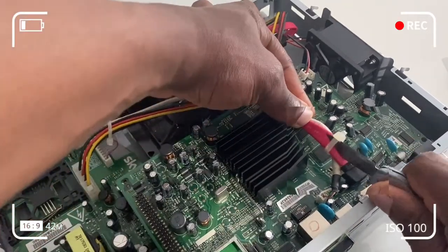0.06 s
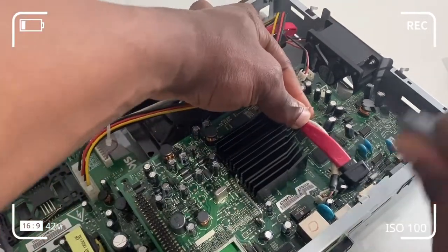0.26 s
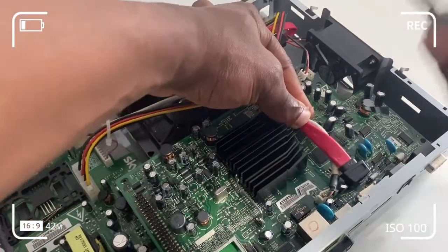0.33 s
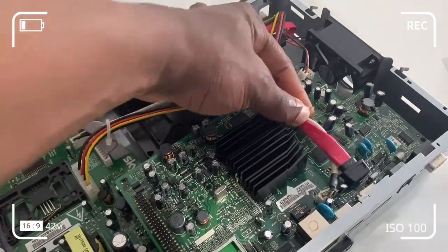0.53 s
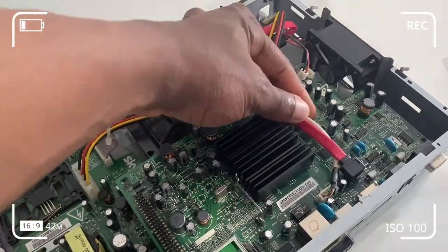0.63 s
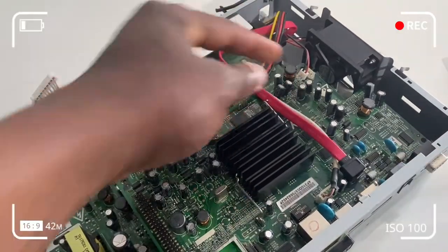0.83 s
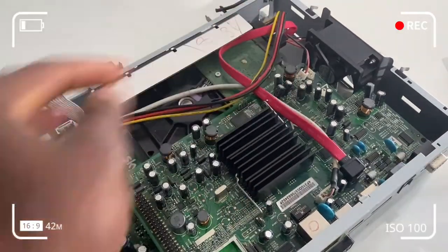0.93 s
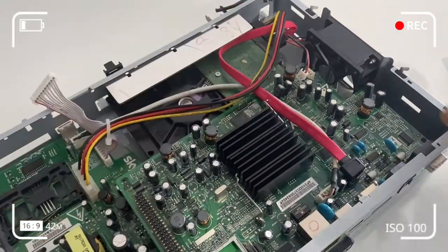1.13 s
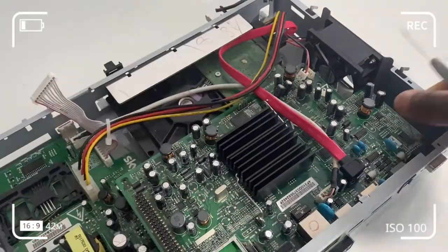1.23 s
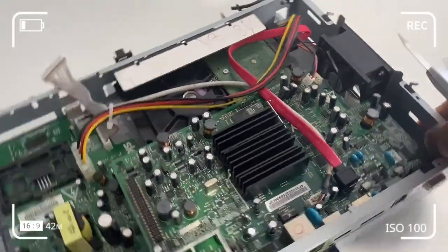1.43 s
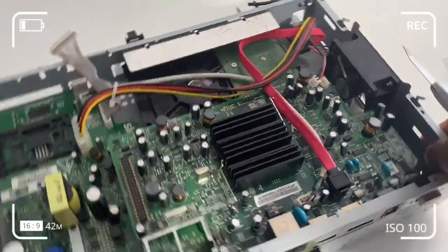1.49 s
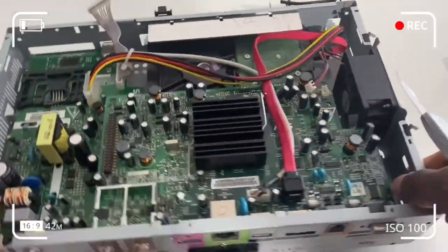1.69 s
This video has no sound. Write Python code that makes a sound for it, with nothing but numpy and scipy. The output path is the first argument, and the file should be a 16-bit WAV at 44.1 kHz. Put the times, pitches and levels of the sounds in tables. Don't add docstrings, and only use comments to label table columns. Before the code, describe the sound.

A blade snaps a plastic cable tie with a loud crack and brief metal rattle; quiet finger taps, tiny ticks, a case scrape and a closing thud follow, close stereo microphone, small room.

```python
import sys
import numpy as np
from scipy import signal
from scipy.fft import rfft, irfft, next_fast_len
from scipy.io import wavfile
from scipy.ndimage import uniform_filter1d, map_coordinates

SR = 44100
rng = np.random.default_rng(int(sys.argv[2]) if len(sys.argv) > 2 else 0)


def boost_factor(decibels):
    exponent = np.asarray(decibels, float) / 20
    return 10 ** exponent


def wav_out(sig):
    wavfile.write(sys.argv[1], SR, np.round(np.clip(np.atleast_2d(sig).T, -1, 1) * 32767).astype(np.int16))


N = 77175
SCENE_S = np.arange(N) / SR
EVENT_S = np.arange(SR // 2) / SR

# start [s], level [dB].
SNAP = [
    (0.2327, -14),
    (.2334, -4.5),
    (.235, -11.5),
    (.2382, -8),
    (.2398, -13),
    (.2416, -14),
]


def unit(x):
    return x / np.sqrt(np.mean(x ** 2) + 1e-20)


def along(points, hz):
    point_hz, value = np.transpose(points)
    return np.interp(np.log(hz + 1), np.log(point_hz + 1), value)


def filtered(x, response):
    size = next_fast_len(x.shape[-1] + 8192)
    spectrum = rfft(x, size) * response(np.fft.rfftfreq(size, 1 / SR))
    return irfft(spectrum, size)[..., :x.shape[-1]]


def noise(spectrum, size):
    return unit(filtered(rng.standard_normal(size), lambda hz: boost_factor(along(spectrum, hz))))


def wobble(rate_hz):
    knots = rng.standard_normal(int(N * rate_hz / SR) + 4)
    return map_coordinates(knots, [np.arange(N) * rate_hz / SR])


def fade(rise_s, t60_s):
    return (1 - np.exp(-EVENT_S / max(rise_s, 1e-4))) * boost_factor(-60 * EVENT_S / t60_s)


def ring(modes, rise_s, scatter_db):
    out = 0
    for hz, db, t60_s in modes:
        level = boost_factor(db + scatter_db * rng.normal())
        out = out + level * fade(rise_s, t60_s) * np.sin(2 * np.pi * hz * EVENT_S)
    return out


def add(out, start_s, x):
    part = out[round(start_s * SR):][:len(x)]
    part += x[:len(part)]


def room(x):
    # frequency [Hz], t60 [s].
    room_t60 = [(100, 0.23), (700, 0.23), (1500, 0.17), (4500, 0.23), (12000, 0.12)]
    hz, t, z = signal.stft(rng.standard_normal((2, SR // 2)), SR, nperseg=256)
    decay = boost_factor(-60 * t / along(room_t60, hz)[:, None])
    tail = signal.istft(z * decay, SR, nperseg=256)[1]
    tail = tail / np.linalg.norm(tail[0])
    delayed = np.pad(x, (200, 0))[None]
    return signal.fftconvolve(delayed, tail, axes=1)[:, :N]


def handling():
    # time [s], fizz level [dB], rumble level [dB].
    levels = [(0, -70, -65), (.07, -75, -67), (.2, -90, -66), (.39, -67, -61), (.45, -73.5, -69),
              (.6, -70, -61.5), (0.748, -70.5, -63), (.86, -80.5, -65.5), (0.899, -83.5, -71),
              (1.219, -87, -78), (1.26, -81, -57), (1.363, -57, -55.5), (1.47, -74, -57.5),
              (1.559, -72.5, -66.5), (1.7, -67, -66), (1.75, -55, -74)]
    # frequency [Hz], level [dB].
    fizz_spectrum = [(150, -28.5), (300, -7), (800, -2), (2200, -6.5), (6000, -13.5), (10000, -18.5),
                     (13000, -24.5), (16000, -41)]
    # frequency [Hz], level [dB].
    rumble_spectrum = [(20, -15.5), (45, -2), (80, -0.5), (160, -7), (330, -14), (480, -24), (750, -23.5),
                       (1100, -49)]
    s, fizz_db, rumble_db = np.transpose(levels)
    fizz_db = np.interp(SCENE_S, s, fizz_db) + 1.4 * wobble(27) + 0.58 * wobble(430) + 0.5
    rumble_db = np.interp(SCENE_S, s, rumble_db) + 2.5 * wobble(19)
    return boost_factor(fizz_db) * noise(fizz_spectrum, N) + boost_factor(rumble_db) * noise(rumble_spectrum, N)


def brush(rows, spectrum):
    # frequency [Hz], level [dB], t60 [s].
    panel = [(705, -1, 0.087), (880, 0.5, 0.0653), (1293, -2.5, 0.013), (1940, -9, 0.068)]
    grain_db = 19
    out = np.zeros(N)
    for s, db, rise_s, t60_s, ring_db in rows:
        grain = boost_factor(grain_db * uniform_filter1d(rng.standard_normal(len(EVENT_S)), size=40))
        rub = fade(rise_s, t60_s) * unit(grain * noise(spectrum, len(EVENT_S)))
        add(out, s, boost_factor(db) * (rub + boost_factor(ring_db) * ring(panel, rise_s, 1.2)))
    return out


def finger_taps():
    # start [s], level [dB], rise [s], t60 [s], panel ring [dB].
    touches = [(.175, -66.5, 0.0047, 0.11, -7), (.212, -52.5, 0.021, 0.63, -29),
               (.451, -58.5, 0.0018, .04, -14), (.476, -54.5, 0.0022, 0.036, -17),
               (.591, -66.5, 0.0013, 0.028, 9.5), (.596, -52, 0.0026, 0.15, -8),
               (.63, -54.5, .002, 0.069, -22.5), (.6775, -52, 0.0011, 0.041, -12),
               (.69, -48.5, 0.0016, 0.029, -4), (.759, -48, 0.0023, 0.028, -34),
               (.765, -43, 0.006, 0.073, -4), (.819, -57, 0.0019, 0.044, -1),
               (1.358, -48, 0.00066, 0.11, -7), (1.608, -58.5, 0.0015, 0.062, -6.5),
               (1.64, -62, 0.0018, 0.052, -11), (1.722, -54, 0.002, 0.096, 6),
               (1.725, -43, 0.003, 0.29, -14), (1.742, -47, 0.0023, 0.13, 2)]
    # frequency [Hz], level [dB].
    touch_spectrum = [(150, -35), (300, -7.5), (600, -4), (2200, -4.5), (5000, -12), (9000, -20.5),
                      (16000, -28.5)]
    return brush(touches, touch_spectrum)


def case_scrapes():
    # start [s], level [dB], rise [s], t60 [s], panel ring [dB].
    slides = [
        (.513, -45, 0.0061, 0.045, -10),
        (.764, -42.5, 0.00077, 0.023, -23),
        (1.229, -51.5, 0.0076, 0.19, -5),
        (1.249, -38.5, 0.0031, 0.2, -14.5),
        (1.275, -54, 0.0022, 0.044, -15),
        (1.305, -55, 0.0051, 0.25, 6),
        (1.374, -48.5, 0.002, 0.27, 1),
        (1.3955, -34, 0.00079, 0.05, -10.5),
        (1.432, -53, 0.0043, 0.14, -26.5),
    ]
    # frequency [Hz], level [dB].
    scrape_spectrum = [(150, -45.5), (300, -5), (600, -4), (2200, -7), (5500, -6), (9000, -10),
                       (16000, -13)]
    return brush(slides, scrape_spectrum)


def panel_buzz():
    start_s, rise_s, end_s, fall_s, level_db = 1.378, 0.014, 1.427, 0.0054, -41.5
    rise = np.clip((SCENE_S - start_s) / rise_s, 0, 1) ** 2
    fall = np.clip((end_s - SCENE_S) / fall_s, 0, 1)
    modes = 0
    for hz, db in [(680, -0.5), (855, -10)]:
        phase = 2 * np.pi * hz * SCENE_S + 1.06 * wobble(110)
        modes = modes + boost_factor(db + 2.8 * wobble(90)) * np.sin(phase)
    return boost_factor(level_db) * rise * fall * modes


def wire_squeak():
    start_s, length_s, centre_hz, width_hz, level_db = 0.7, 0.062, 10220, 150, -76
    white = rng.standard_normal(len(EVENT_S))
    thin = unit(filtered(white, lambda hz: np.exp(-((hz - centre_hz) / width_hz) ** 2)))
    swell = np.sin(np.pi * np.clip(EVENT_S / length_s, 0, 1))
    out = np.zeros(N)
    add(out, start_s, boost_factor(level_db) * thin * swell)
    return out


def thuds():
    # start [s], level [dB], frequency [Hz], t60 [s].
    blows = [(0.2405, -13, 149.9, 0.045), (.236, -28.5, 213.3, 0.2), (0.2337, -18.5, 322.4, 0.052),
             (0.2691, -17.5, 106.5, 0.065), (.279, -31.5, 194, 0.11), (0.32, -40.5, 93.4, 0.09),
             (.352, -43, 69.4, 0.11), (0.702, -40, 177, 0.052), (0.849, -57.5, 333.7, 0.14),
             (1.253, -38, 480, 0.045), (0.689, -44, 488, 0.052), (1.2913, -30.5, 93, 0.049),
             (1.413, -49, 113.3, 0.2), (1.451, -55.5, 64.7, 0.57), (1.726, -16.5, 203, 0.025),
             (1.727, -29, 70.1, 0.09), (1.7308, -12, 121.1, 0.045)]
    out = np.zeros(N)
    for s, db, hz, t60_s in blows:
        add(out, s, boost_factor(db) * ring([(hz, 0, t60_s)], 0.006, 0))
    return out


def ticks():
    # start [s], level [dB], index of part.
    drops = [
        (1.032, -48.5, 0),
        (1.047, -52.5, 1),
        (1.115, -43, 2),
        (1.1273, -59, 2),
    ]
    # frequency [Hz], level [dB], t60 [s].
    parts = [
        [(2050, 4, .011), (2310, -12, .06), (2200, -17, .05), (5300, -8, .012), (9000, -12, .012),
         (11500, -9, .012)],
        [(2300, -9, .02), (3800, -3, .015)],
        [(2300, -17, .02), (3710, -12, .015), (5440, -2, .02), (5900, -2, .014), (9300, 0, .008),
         (14400, -17, .09)],
    ]
    crack_spectrum = [(1200, -42.5), (2000, -5.5), (6000, 7.0), (16000, -10)]  # Hz, dB
    crack_db, crack_t60_s, tail_db, tail_t60_s = -10, 0.0095, -22, 0.14
    out = np.zeros(N)
    for s, db, part in drops:
        shape = boost_factor(crack_db) * fade(0.00022, crack_t60_s) + boost_factor(tail_db) * fade(0.0034, tail_t60_s)
        crack = shape * noise(crack_spectrum, len(EVENT_S))
        add(out, s, boost_factor(db) * (ring(parts[part], 0.00092, 1.8) + crack))
    return out


def knocks():
    # start [s], level [dB], frequency [Hz], t60 [s].
    contacts = [(0.237, -15, 5780, 0.017), (.2475, -24, 5200, 0.016), (0.238, -12, 2270, 0.01),
                (0.24, -16, 3230, 0.016), (.577, -56.5, 2216, 0.024), (.591, -52, 846, 0.034),
                (.5965, -58, 3555, .012), (.604, -51, 2540, 0.041), (0.616, -51, 2500, 0.037),
                (.6315, -55, 2100, 0.033), (.648, -59.5, 2000, 0.027), (.679, -51.5, 1400, 0.024),
                (.691, -59, 4350, 0.018), (.692, -54, 1840, 0.017), (0.7584, -54, 5000, .008),
                (0.7661, -43.5, 2645, 0.016), (0.771, -49, 1120, 0.012), (.776, -46, 847, 0.044),
                (0.819, -60, 2418, 0.022), (1.2557, -50, 3680, .02), (1.2732, -48, 3180, .02),
                (1.279, -44.5, 2170, 0.028), (1.284, -48, 1690, 0.023), (1.359, -42, 4750, 0.012),
                (1.3607, -39, 2000, 0.024), (1.3747, -46.5, 1860, 0.036), (1.383, -43, 2214, 0.058),
                (1.391, -40, 1544, 0.053), (1.4, -45.5, 1517, 0.056), (1.396, -29, 5410, 0.02),
                (1.401, -37, 4470, 0.027), (1.53, -59, 4020, .03), (1.609, -60.5, 897, 0.035),
                (1.612, -57, 1304, 0.046), (1.643, -58, 1252, 0.044), (1.668, -58.5, 880, 0.036),
                (1.69, -67, 1248, 0.033), (1.7218, -49.5, 2143, .008), (1.7241, -42, 547.5, 0.063),
                (1.7263, -42.5, 1700, .03), (1.73, -56, 2390, 0.018), (1.7452, -31, 925, 0.037),
                (1.7475, -36, 744, .03)]
    waver_rad, rise_s = 1.3, 0.0003
    out = np.zeros(N)
    for s, db, hz, t60_s in contacts:
        waver = waver_rad * unit(uniform_filter1d(rng.standard_normal(len(EVENT_S)), size=60))
        note = np.sin(2 * np.pi * hz * EVENT_S + waver - waver[0])
        add(out, s, boost_factor(db) * fade(rise_s, t60_s) * note)
    return out


def floor_boom():
    # frequency [Hz], level [dB].
    boom_spectrum = [(30, -29.5), (60, -6), (120, -0.5), (250, -5), (450, -12), (700, -40)]
    level_db, rise_s, t60_s = -36, 0.0033, 0.39
    out = np.zeros(N)
    add(out, SNAP[1][0], boost_factor(level_db) * fade(rise_s, t60_s) * noise(boom_spectrum, len(EVENT_S)))
    return out


def snap():
    # frequency [Hz], level [dB], t60 [s].
    case_modes = [(867, -12, 0.12), (1080, -24, 0.13), (1365, -10, 0.09), (1680, -11.5, 0.013),
                  (1885, -6.5, 0.02), (2381, -12.5, 0.19), (2870, -19, 0.067), (3222, -20, 0.15),
                  (5220, -21, 0.11), (5000, -18, 0.043), (5390, -21, 0.02), (8840, -15, 0.047),
                  (10430, -20, 0.018)]
    # frequency [Hz], level [dB].
    crack_spectrum = [(200, -43), (400, -21), (750, -14), (1100, -7), (2000, -4), (6000, -7), (9000, -12),
                      (16000, -17.5)]
    # frequency [Hz], level [dB].
    crash_spectrum = [(300, -29.5), (700, -7.5), (2000, -5), (5300, -6), (10000, -14.5), (13000, -24),
                      (16000, -29.5)]
    # (frequency [Hz], level [dB], t60 [s]).
    body_knocks = [
        (.2329, -8.5, [(750, 1, 0.038)]),
        (.2384, -14, [(684.8, 1, .09), (777, -3, .05)]),
    ]
    # frequency [Hz], level [dB], t60 [s].
    tie_modes = [
        (1843, 3.5, 0.015),
    ]
    crack_db, crack_t60_s = -3.5, 0.02
    crash_db, crash_t60_s = -30.5, 0.29
    ring_db = -10
    out = np.zeros(N)
    for s, db in SNAP:
        crack = boost_factor(crack_db) * fade(0.00015, crack_t60_s) * noise(crack_spectrum, len(EVENT_S))
        crash = boost_factor(crash_db) * fade(0.002, crash_t60_s) * noise(crash_spectrum, len(EVENT_S))
        add(out, s, boost_factor(db) * (crack + crash + boost_factor(ring_db) * ring(case_modes, 0.0003, 1)))
    for s, db, modes in body_knocks:
        add(out, s, boost_factor(db) * ring(modes, 0.001, 0))
    add(out, SNAP[0][0], boost_factor(SNAP[1][1]) * ring(tie_modes, 0.00048, 0))
    return out


def lead_rad(hz):
    # frequency [Hz], phase [rad].
    channel_lead = [(0, 0), (180, -.06), (550, -.9), (1700, -.1), (2800, 1), (5200, .4), (6800, 3.02),
                    (8100, 3.4), (10000, 6.2), (11200, 6.4), (12900, 9.35), (14200, 9.6), (16000, 12.6)]
    return np.interp(hz, *np.transpose(channel_lead))


def scene():
    room_db, opposed_db, apart_db = -14, -1.5, 2
    near = finger_taps() + case_scrapes() + panel_buzz() + wire_squeak() + thuds()
    near = near + knocks() + floor_boom() + snap()
    shared, opposed = boost_factor(room_db) * room(near)
    diffuse = boost_factor(opposed_db) * opposed + handling()
    apart = boost_factor(apart_db) * filtered(diffuse, lambda hz: 1j * np.sin(lead_rad(hz)))
    return near + shared + ticks() + handling() + np.array([apart, -apart])


def top_cut(x):
    return signal.sosfilt(signal.butter(12, 16870, fs=SR, output="sos"), x)


def record(dry):
    # frequency [Hz], left minus right [dB].
    channel_balance = [(380, 0), (700, -4), (1400, -4), (2400, -2), (5200, -.5), (6500, 0)]
    ceiling, top_hz, bottom_hz = 0.9, 15980, 30

    def ports(hz):
        left = np.exp(0.5j * lead_rad(hz)) * boost_factor(along(channel_balance, hz) / 2)
        return np.array([left, 1 / left])

    def band_limits(hz):
        low_pass = np.clip((top_hz - hz) / 250, 0, 1) ** 2
        high_pass = (1j * hz / (bottom_hz + 1j * hz)) ** 2
        return low_pass * high_pass

    x = filtered(dry, ports)
    x = x / (1 + (x / ceiling) ** 4) ** 0.25
    return top_cut(filtered(x, band_limits))


dry = scene()
out = record(dry)
wav_out(out)
```